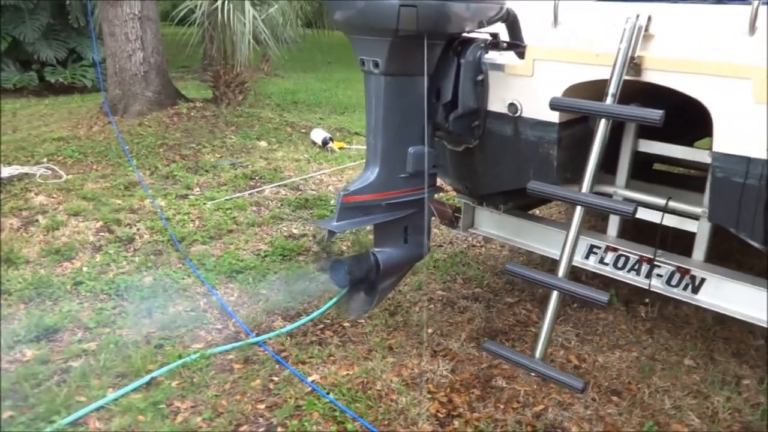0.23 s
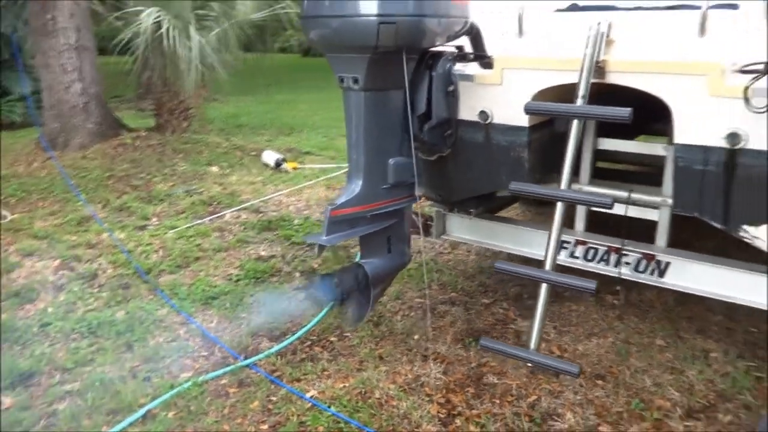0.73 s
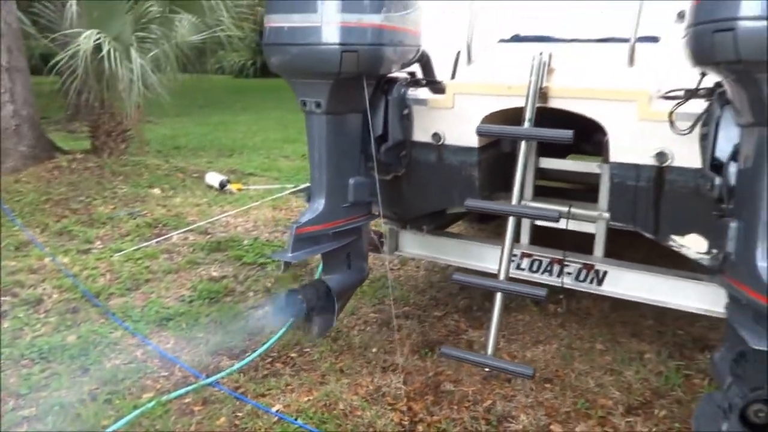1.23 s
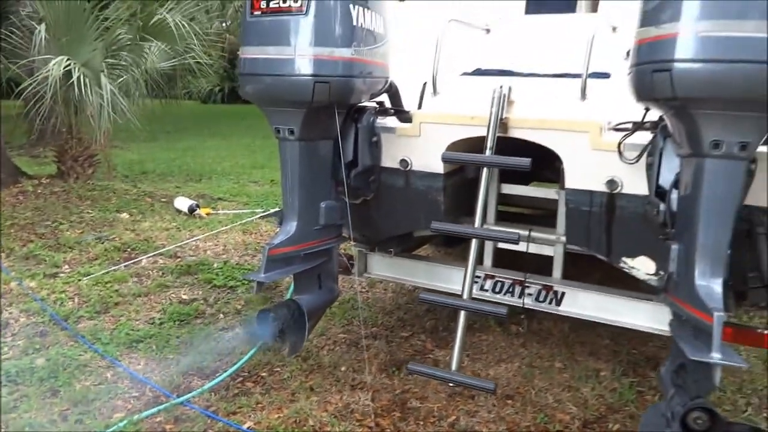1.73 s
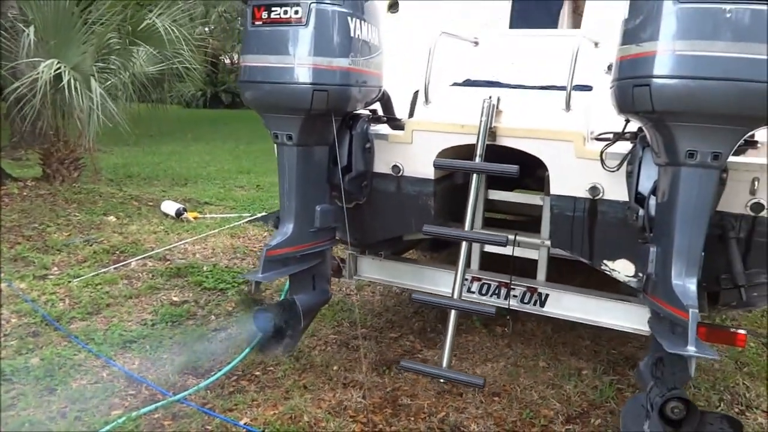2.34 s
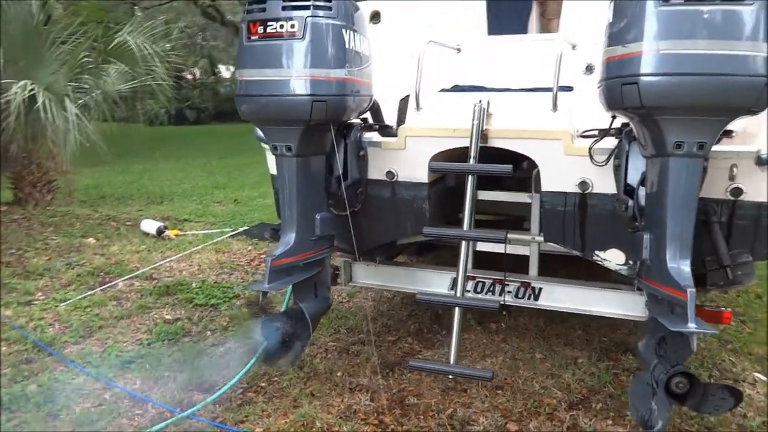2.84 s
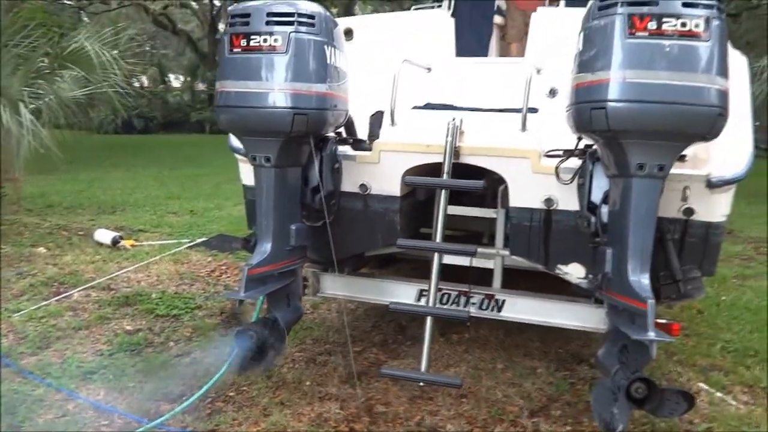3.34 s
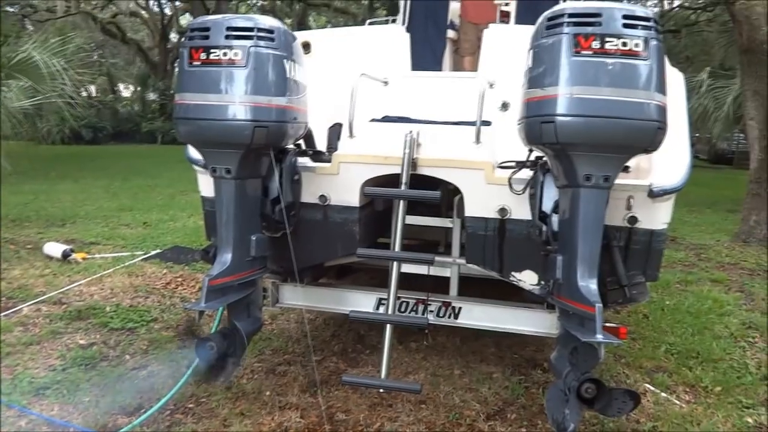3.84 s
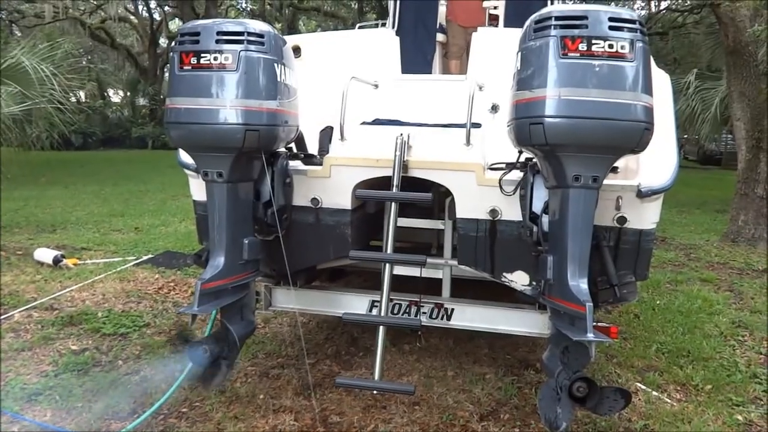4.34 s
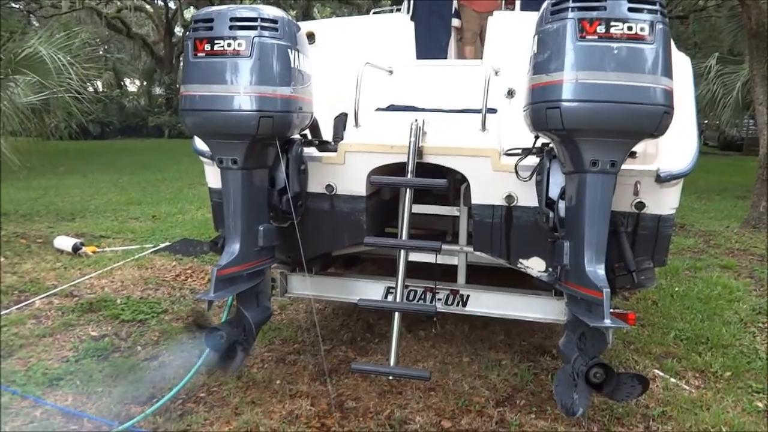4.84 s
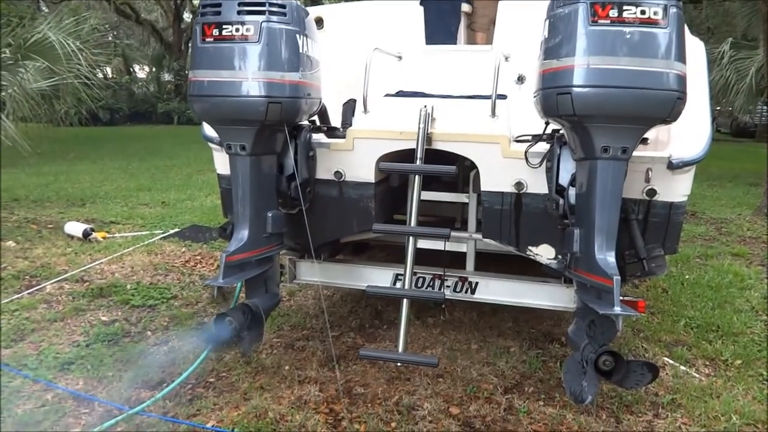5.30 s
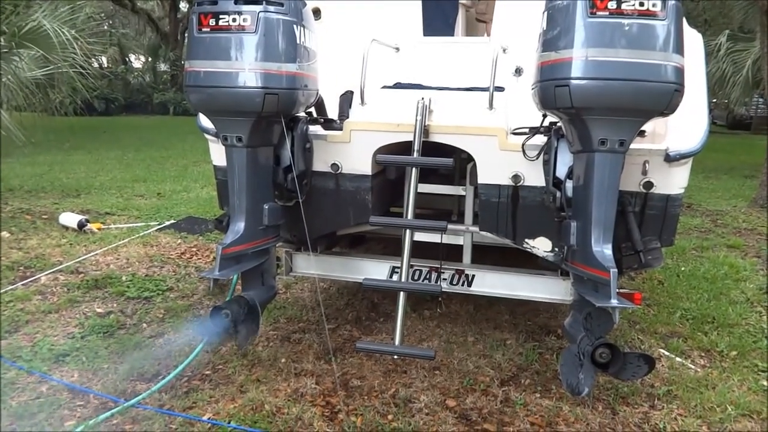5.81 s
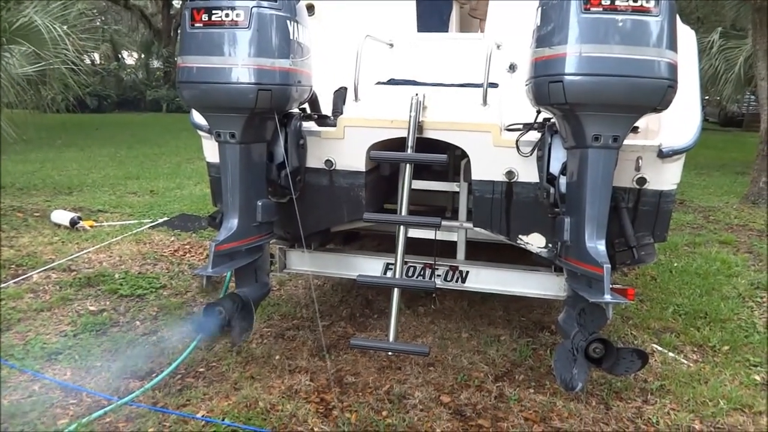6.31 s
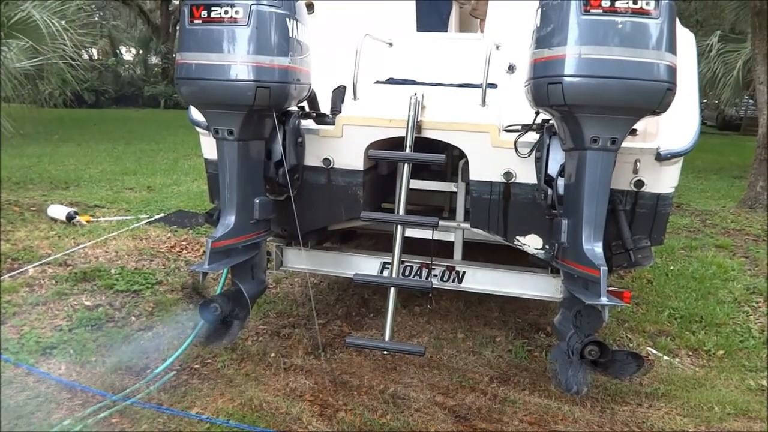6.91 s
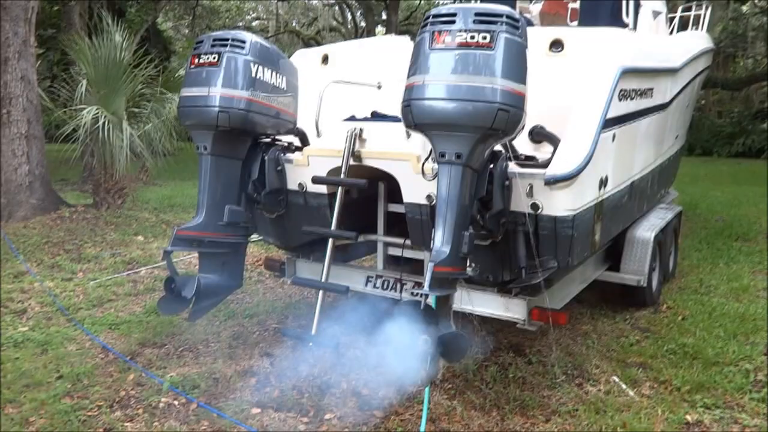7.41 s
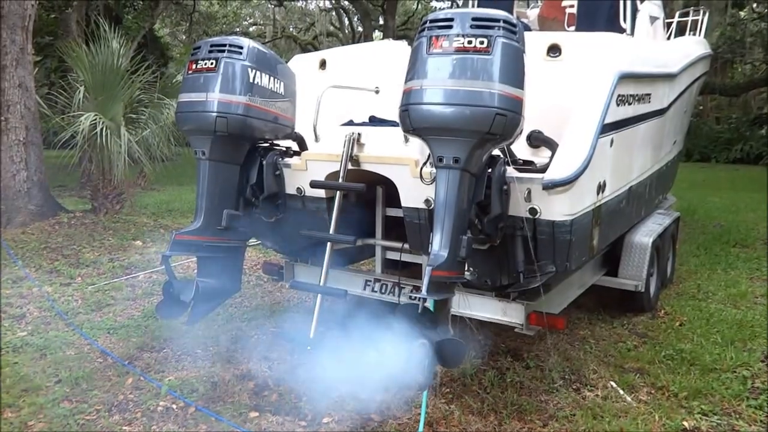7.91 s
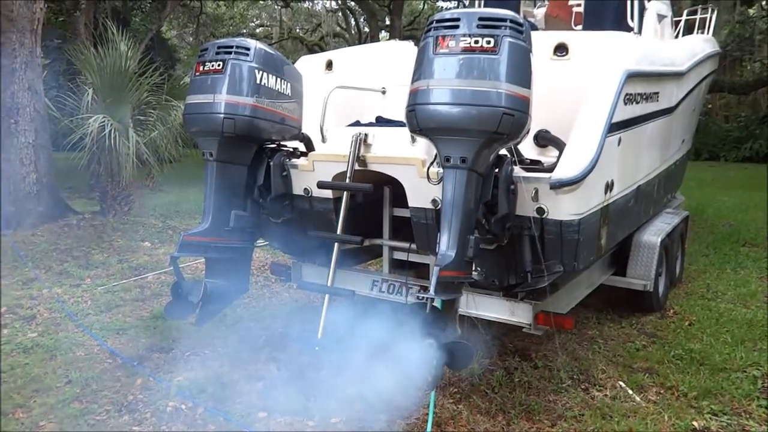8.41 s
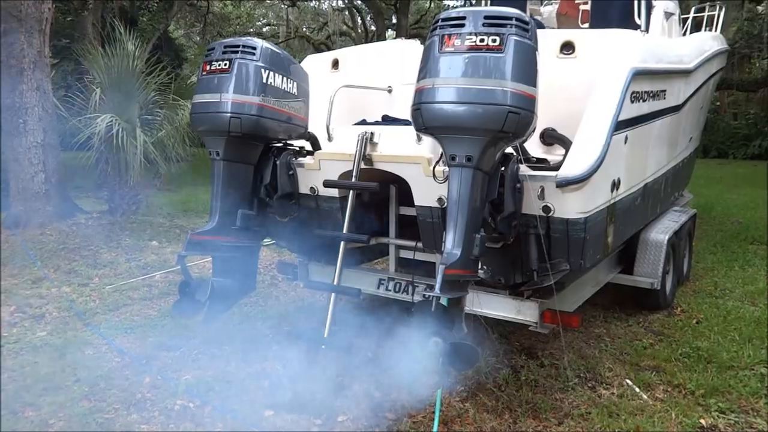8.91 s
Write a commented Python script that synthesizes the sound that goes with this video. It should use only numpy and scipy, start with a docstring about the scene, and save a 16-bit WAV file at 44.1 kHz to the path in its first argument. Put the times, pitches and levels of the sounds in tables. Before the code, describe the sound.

Outdoors on a lawn, close to the stern, a big two-stroke outboard idles with a rough, loping rattle, hard pops, misfires and wet spitting hiss. After about six and a half seconds it cuts dead. A second of total silence follows, then a second engine stutters in, faster and denser, and drops in speed toward the end.

```python
"""Two big six-cylinder two-stroke outboards idle out of the water on a lawn, one after the other.
The port engine lopes near 88 firings a second while the listener walks round to its stern; after a
second of silence the starboard engine runs faster and slows towards idle. Each firing rings the exhaust
passages, leg and cowl and spits wet hiss. Strong and weak firings, misses and hard pops make it uneven,
over a steady whirr of belts, gears and running water."""
import sys
import numpy as np
from scipy import signal
from scipy.fft import rfft, irfft, next_fast_len
from scipy.io import wavfile
from scipy.ndimage import uniform_filter1d

SR = 44100
rng = np.random.default_rng(int(sys.argv[2]) if len(sys.argv) > 2 else 0)


def to_wav(sig):
    """Store sig (one row per channel, or 1-D mono) as 16-bit WAV at the path in sys.argv[1].

    Samples outside -1..1 are clipped; the rate is SR.
    """
    pcm = np.clip(np.atleast_2d(sig), -1, 1) * 32767
    pcm = np.round(pcm).astype(np.int16)
    wavfile.write(sys.argv[1], SR, pcm.T)  # frames by channels


N = 403515
TIME = np.arange(N) / SR  # seconds

# Engine speed. Each row: time in seconds, speed in firings per second.
PORT_SPEED = [(0.0, 93.54), (0.35, 95.82), (0.55, 88.32), (1.42, 88.51), (1.51, 85.4), (1.92, 85.73),
              (2.51, 89.53), (2.59, 87.11), (3.23, 92.48), (3.48, 89.53), (3.71, 87.03), (4.43, 86.99),
              (4.51, 89.19), (5.32, 84.99), (5.47, 88.44), (6.0, 86.7), (6.11, 91.01), (6.51, 86.54)]
STARBOARD_SPEED = [(7.55, 130.31), (7.7, 126.72), (7.95, 124.27), (8.15, 127.63), (8.35, 131.74),
                   (8.55, 126.1), (8.7, 119.25), (8.9, 111.49), (9.15, 97.82)]
# Ordinary firings. Each row: time in seconds, strength in dB (only strength relative to other firings counts).
PORT_FIRING = [(0, -15.7), (1.3, -15.8), (2.4, -14.3), (3.5, -16.2), (4.3, -14.8), (6.5, -15.6)]
STARBOARD_FIRING = [(7.6, -14.5), (8.1, -19), (9.1, -18.3)]
# The hardest pops. Each row: time in seconds, strength in dB on the same scale.
PORT_POPS = [(0.404, -8), (0.5681, -12), (0.8629, -9), (1.0645, -8), (1.1932, -9), (1.2725, -9),
             (1.497, -8), (1.7544, -7), (1.8931, -9), (2.0572, -7), (2.2832, -10), (2.4498, -8),
             (2.9517, -8), (2.9854, -9), (3.454, -11), (3.6117, -9), (3.7384, -8), (4.1514, -11),
             (4.4179, -9), (4.7102, -11), (4.8249, -10), (5.2165, -11), (5.6077, -8), (5.9983, -8),
             (6.133, -8), (6.2662, -10), (6.4028, -11)]
STARBOARD_POPS = [(7.5524, -12), (7.5974, -10), (7.6774, -10), (7.6924, -7), (7.7717, -11), (7.8714, -6),
                  (7.9554, -11), (8.0182, -10), (8.099, -9), (8.2003, -9), (8.2834, -8), (8.3439, -12),
                  (8.4158, -11), (8.5235, -10), (8.6114, -12), (8.6692, -9), (8.763, -9), (8.8588, -10),
                  (8.9745, -8), (9.0319, -9), (9.1017, -9)]
# The port engine's cylinders in firing order.
# Each row: extra strength in dB heard from the side, extra strength in dB heard from astern.
CYLINDERS = [(.3, -1.6), (3.3, -1.8), (2.6, 2.6), (1.8, 2.4), (-4.5, 2.1), (.3, -4.8)]
# The beat of the cylinders changes as the stern comes into view.
# Each row: time in seconds, share heard from astern (0 to 1).
BANK_TURN = [(2.1, 0), (2.9, 1)]
# Resonances of the port exhaust passages, leg and cowl.
# Each row: pitch in Hz, width in Hz, level in dB per Hz from the side, level in dB per Hz from astern.
PORT_MODES = [(112, 50, -43.5, -46), (143.7, 31.6, -35, -35), (181.2, 46, -37.5, -37.5),
              (251, 61, -43, -39.5), (358.2, 42, -44.5, -46), (443.5, 40, -45, -48.5), (556, 32, -42, -41),
              (741, 89, -44.5, -45), (795, 40.4, -33.8, -40.5), (867.7, 61.6, -43, -36),
              (1014, 58, -45, -49.5), (1190, 88, -48.5, -55.5), (1368, 56.4, -48, -46.5),
              (1876, 84, -54, -52), (2197, 61, -54, -57), (2404, 80, -62, -57), (2863, 94, -59.5, -67),
              (3140, 70, -54.5, -60.5), (3472, 96, -61.5, -59.5), (3810, 140, -57.5, -56.5),
              (3990, 140, -65, -57), (4680, 120, -59.5, -66), (4970, 140, -68, -64), (5900, 400, -63, -72),
              (7150, 300, -68, -68)]
# The same for the starboard engine. Each row: pitch in Hz, width in Hz, level in dB per Hz.
STARBOARD_MODES = [(133, 52, -37.3), (244, 52, -39.3), (305, 25, -44), (385, 40, -41.2), (455, 50, -42),
                   (562, 24, -41), (781, 45, -37), (901, 60, -40.5), (1011, 42, -38.5), (1185, 42, -44.5),
                   (1387, 79, -54), (1780, 140, -57.5), (2190, 87, -52), (2366, 99, -55.5),
                   (3080, 180, -59), (3680, 190, -60), (4270, 156, -58.5), (4770, 88, -56.5)]
# Tone of gas and cooling water spat from the propeller hub.
# Each row: frequency in Hz, relative level in dB.
PORT_SPIT = [(1650, -8), (2200, 1.5), (2650, -5), (3300, -2), (4700, 3), (5450, -3), (6600, -1.5),
             (7800, 0.5), (10200, 0), (12500, -2.3), (16000, -2)]
STARBOARD_SPIT = [(1700, -7), (2800, 2.5), (4500, .5), (6200, -1.5), (7700, -.5), (8600, 2), (10800, -2),
                  (16000, 1)]
# Fineness of the spray. Each row: time in seconds, boost of the top band of the hiss in dB.
PORT_MIST = [(0, .5), (2.2, 1), (3.4, .3), (5, .3)]
STARBOARD_MIST = [(7.6, -1.3), (8.3, -3), (9, 1.7)]
# Belts, gears and running water, before each engine's trim. Each row: frequency in Hz, level in dB per Hz.
WHIRR = [(28, -60), (50, -48.5), (120, -43.5), (400, -59.5), (900, -61), (1700, -72), (4000, -79.5),
         (16000, -95.5)]
# Phase between the two microphone ports. Each row: frequency in Hz, lead of the left in radians.
PORTS_PHASE = [(60, -.25), (260, -.38), (900, -.23), (1400, -.15), (2100, -.04), (3500, -.04), (7000, -.09),
               (10000, -.05)]
# Level between the two ports, for each engine. Each row: frequency in Hz, left minus right in dB.
PORT_BALANCE = [(290, -1.1), (640, .35), (3300, .3), (4600, 1), (5600, 2.8), (6800, 2.8), (8500, .2)]
STARBOARD_BALANCE = [(290, -1.7), (800, -1), (3100, -0.6), (5000, 0)]
# Faint delayed sound, opposite in the two channels, that widens the stereo image.
# Each row: frequency in Hz, level in dB relative to the direct sound.
WIDENING = [(150, -27), (500, -21), (3000, -24), (5800, -15), (8500, -26)]
# The sound is switched off, then stutters back on. Each row: time in seconds, gain.
SWITCH = [(6.514, 1), (6.515, .02), (6.533, .008), (6.534, 0), (7.512, 0), (7.5125, 1), (7.521, 1),
          (7.5225, 0), (7.527, 0), (7.541, .25), (7.55, 1)]

PORT_SPAN, STARBOARD_SPAN = (-.03, 6.55), (7.49, 9.18)  # seconds during which each engine runs
PORT_BEAT_S, STARBOARD_BEAT_S = .0021, 7.552  # about when a first cylinder fires
LOPE_DB = 2.7  # random spread from one firing to the next
FULL_CHARGE_DB = -10.5  # cap on an ordinary firing, before pops and later scatter
BOUNCE_LAG_S, BOUNCE_GAIN = (.0003, .0012), .7  # spray off the ground: shortest and longest lag, strength
WIDENING_DELAY_S = .023
CUTOFF_HZ = 15900
FFT_SIZE = next_fast_len(N)
BIN_HZ = np.fft.rfftfreq(FFT_SIZE, 1 / SR)
TINY = 1e-18  # keeps silent filters from slowing down


def from_db(db):
    """Turn decibels into gain."""
    return 10 ** (np.asarray(db) / 20)


def at_time(rows, s):
    """Read a curve of times and values, with straight lines between its rows."""
    return np.interp(s, *np.transpose(rows))


def per_bin(points):
    """Read a curve of frequencies and values at every frequency bin, on a log axis."""
    hz, value = np.transpose(points)
    return np.interp(np.log(BIN_HZ + 1), np.log(hz), value)


def filtered(x, gain):
    """Apply one gain per frequency bin."""
    return irfft(rfft(x, FFT_SIZE) * gain, FFT_SIZE)[..., :N]


def noise(spectrum):
    """Make random noise with the given density in dB per Hz."""
    return filtered(rng.standard_normal(N), from_db(per_bin(spectrum))) * np.sqrt(SR / 2)


def band(x, low_hz, high_hz, order=1):
    """Keep mainly the sound between two frequencies."""
    sos = signal.butter(order, [low_hz, high_hz], "band", fs=SR, output="sos")
    return signal.sosfilt(sos, x + TINY)


def resonate(x, hz, width_hz):
    """Ring one resonance, with gain 1 at its peak and its skirts trimmed beyond a few widths."""
    r = np.exp(-np.pi * width_hz / SR)
    feed = np.array([1, 0, -1]) * (1 - r * r) / 2
    feedback = [1, -2 * r * np.cos(2 * np.pi * hz / SR), r * r]
    ring = signal.lfilter(feed, feedback, x + TINY)
    skirt = 1 + 2 * width_hz / hz
    return band(ring, hz / skirt, hz * skirt)


def smooth(x, seconds):
    """Spread each value into a fading tail of the same total."""
    r = np.exp(-1 / (seconds * SR))
    return signal.lfilter([1 - r], [1, -r], x + TINY)


def uneven(count):
    """Draw bounded chance, one value per firing, with a spread of 1."""
    return rng.uniform(-1, 1, count) * np.sqrt(3)


def clicks(times, db):
    """Place one click per firing, scaled to a mean power of 1 while the engine runs."""
    out = np.zeros(N)
    gain = from_db(db)
    at = np.round(times * SR).astype(int)
    inside = (at >= 0) & (at < N)
    out[at[inside]] = gain[inside] * np.sqrt(np.ptp(times) * SR / np.sum(gain ** 2))
    return out


def puffs(train, rise_s, decay_s):
    """Shape the gas that escapes after each click: a quick rise and a fading tail."""
    return np.sqrt(smooth(smooth(train ** 2, rise_s), decay_s))


def crank(speed, span, beat_s, hunt_s):
    """Find each firing's time and cylinder by adding up the speed; the crank hunts a little early and late."""
    s = np.arange(*span, 1 / SR)
    phase = np.cumsum(at_time(speed, s)) / SR
    phase -= np.interp(beat_s, s, phase)  # cylinder 0 falls on beat_s, before the hunting
    number = np.arange(np.ceil(phase[0]), phase[-1]).astype(int)
    hunt = uniform_filter1d(uneven(len(number)), size=5)
    times = np.interp(number, phase, s) + hunt_s * hunt / np.std(hunt)
    return times, number % len(CYLINDERS)


def lope(count, memory, miss_share, miss_db):
    """Vary firings in dB: cylinders tend to repeat what they did two turns before, and some pairs miss."""
    luck = uneven(count)
    two_turns = 2 * len(CYLINDERS)  # a two-stroke fires every cylinder once a turn
    for k in range(two_turns, count):
        luck[k] = memory * luck[k - two_turns] + np.sqrt(1 - memory ** 2) * luck[k]
    missed = rng.random(count) < miss_share
    return LOPE_DB * luck - miss_db * (missed | np.roll(missed, 1))


def with_pops(times, ordinary_db, pops, fade_db, miss_db):
    """Add pops: a weak firing leaves fuel for a hard one, whose extra strength fades firing by firing."""
    levels = np.minimum(ordinary_db, FULL_CHARGE_DB)
    for s, db in pops:
        since = np.arange(len(times)) - np.argmin(np.abs(times - s))
        popped = np.maximum(levels, db - fade_db * since)
        before = levels - miss_db * (since == -1)
        levels = np.where(since >= 0, popped, before)
    return levels


def exhaust(times, levels, modes, bass_follow, bass_scatter_db, late_s_per_db, boom_jitter_s, puff_s):
    """Each port opening sends a pressure step and a turbulent puff into the resonances."""
    jitter_s, turbulent_hz = .00015, 1700  # turbulence and steps share the power equally at 1700 Hz
    out = np.zeros(N)
    for hz, width_hz, db in modes:
        # hard firings are brighter: high modes follow their strength fully, low ones less
        follow = np.interp(hz, [200, 900, 2500], [bass_follow, .6, 1])
        scatter_db = np.interp(hz, [150, 400, 3000], [bass_scatter_db, 1.8, 3.8])
        mode_levels = follow * levels + scatter_db * uneven(len(times))
        # the boom of a weak firing builds later, and timing is loosest in the lowest mode
        late_s = late_s_per_db * (levels.mean() - levels) * np.interp(hz, [130, 420], [1, 0])
        spread_s = jitter_s + boom_jitter_s * (modes[0][0] / hz) ** 2
        steps = clicks(times + late_s + spread_s * uneven(len(times)), mode_levels)
        puff = puffs(steps, .0011, puff_s) * rng.standard_normal(N)
        turbulence = hz / (hz + turbulent_hz)
        push = np.sqrt(1 - turbulence) * steps + np.sqrt(turbulence) * puff
        out += from_db(db) * resonate(push, hz, width_hz)
    return out * np.sqrt(SR / 2)


def spit(times, levels, spectrum, level_db, mist, decay_s, echo_share):
    """Each firing spits wet hiss of a slightly different colour; hull and ground draw out its tail."""
    scatter_db = 2.1
    out = np.zeros(N)
    firing = np.searchsorted(times, TIME)
    hiss = noise(spectrum)
    hiss /= np.std(band(hiss, 5000, 16000, order=2)) * np.hypot(1, BOUNCE_GAIN)
    edges_hz = [1000, 2800, 5000, 7500, 10500, 19000]
    for low_hz, high_hz in zip(edges_hz, edges_hz[1:]):
        # every spit tears off at another height, so its bounce off the ground has another lag
        lag = (rng.uniform(*BOUNCE_LAG_S, len(times) + 1) * SR).astype(int)
        bounced = hiss + BOUNCE_GAIN * hiss[np.arange(N) - lag[firing]]
        # big and fine drops tear off at slightly different moments
        torn = times + rng.uniform(-.0008, .0016, len(times))
        drops = clicks(torn, levels + scatter_db * uneven(len(times)))
        direct_power = puffs(drops, .002, decay_s) ** 2
        envelope = np.sqrt(direct_power + echo_share * smooth(direct_power, .009))
        fine = from_db(at_time(mist, TIME)) if high_hz == edges_hz[-1] else 1
        out += fine * band(bounced, low_hz, high_hz, order=2) * envelope
        hiss = np.roll(hiss, SR)  # each band hisses on its own
    return from_db(level_db) * out


def whirr(trim_db):
    """Belts, gears and running water make a steady noise."""
    return from_db(trim_db) * noise(WHIRR)


def at_microphone(x, balance):
    """Two close ports differ slightly in level and phase; a faint delayed sound widens the stereo image."""
    half = from_db(per_bin(balance) / 2) * np.exp(1j * per_bin(PORTS_PHASE) / 2)
    delayed = from_db(per_bin(WIDENING)) * np.exp(-2j * np.pi * BIN_HZ * WIDENING_DELAY_S)
    return filtered(x, np.array([half + delayed, 1 / half - delayed]))


def port_engine():
    """A slow, loping idle, whose colour turns as the listener walks from the side to the stern."""
    times, cylinder = crank(PORT_SPEED, PORT_SPAN, PORT_BEAT_S, hunt_s=.0004)
    from_side, from_astern = np.transpose(CYLINDERS)[:, cylinder]
    beat_db = from_side + at_time(BANK_TURN, times) * (from_astern - from_side)
    lope_db = lope(len(times), memory=.35, miss_share=.09, miss_db=6)
    ordinary_db = at_time(PORT_FIRING, times) + beat_db + lope_db
    levels = with_pops(times, ordinary_db, PORT_POPS, fade_db=2.6, miss_db=5.5)
    astern = at_time([(.7, .075), (2.8, .95)], TIME)  # share of the stern's colour
    modes = [(hz, width_hz, side_db + astern * (stern_db - side_db))
             for hz, width_hz, side_db, stern_db in PORT_MODES]
    bark = exhaust(times, levels, modes, bass_follow=.55, bass_scatter_db=3.0,
                   late_s_per_db=.00004, boom_jitter_s=.00075, puff_s=.0045)
    hiss = spit(times, levels, PORT_SPIT, -31.9, PORT_MIST, decay_s=.003, echo_share=.08)
    return at_microphone(bark + hiss + whirr(0), PORT_BALANCE)


def starboard_engine():
    """A faster idle that chugs and sags near the end."""
    times, _ = crank(STARBOARD_SPEED, STARBOARD_SPAN, STARBOARD_BEAT_S, hunt_s=.00035)
    lope_db = lope(len(times), memory=.3, miss_share=.05, miss_db=4)
    ordinary_db = at_time(STARBOARD_FIRING, times) + lope_db
    levels = with_pops(times, ordinary_db, STARBOARD_POPS, fade_db=1.7, miss_db=4.5)
    levels = levels + 1.5 * uneven(len(times))
    bark = exhaust(times, levels, STARBOARD_MODES, bass_follow=.2, bass_scatter_db=2.5,
                   late_s_per_db=.00022, boom_jitter_s=.0004, puff_s=.004)
    hiss = spit(times, levels, STARBOARD_SPIT, -31.2, STARBOARD_MIST, decay_s=.004, echo_share=.09)
    return at_microphone(bark + hiss + whirr(-2), STARBOARD_BALANCE)


def scene():
    """Play first the port engine, then the starboard engine."""
    return np.where(TIME < PORT_SPAN[1], port_engine(), starboard_engine())


def record(dry):
    """Round the loudest peaks, switch the sound off and on, and cut the top."""
    rounded = dry / (1 + np.abs(dry) ** 6) ** (1 / 6)
    switched = rounded * at_time(SWITCH, TIME)
    top_cut = signal.ellip(12, .1, 90, CUTOFF_HZ, fs=SR, output="sos")
    return signal.sosfilt(top_cut, switched)


dry = scene()
out = record(dry)
to_wav(out)
```